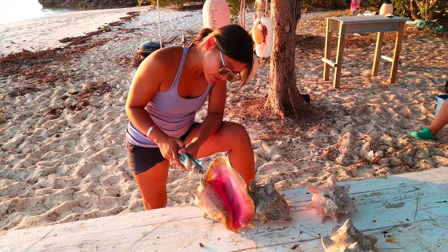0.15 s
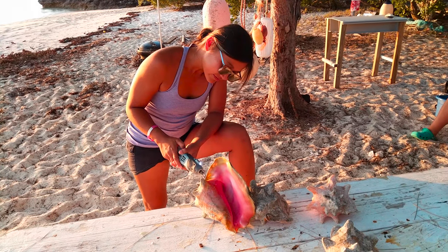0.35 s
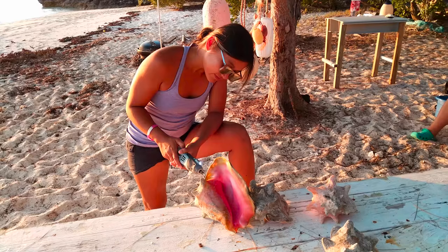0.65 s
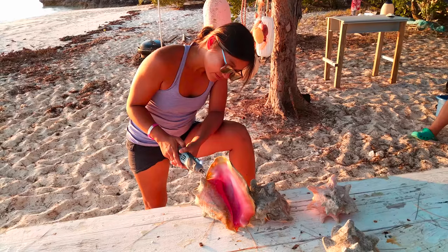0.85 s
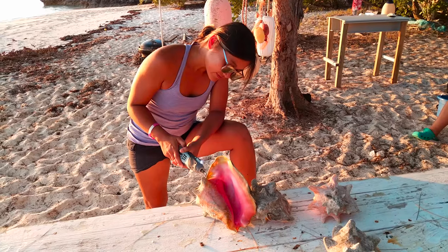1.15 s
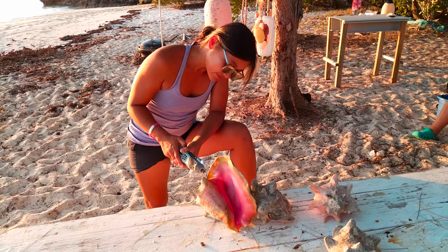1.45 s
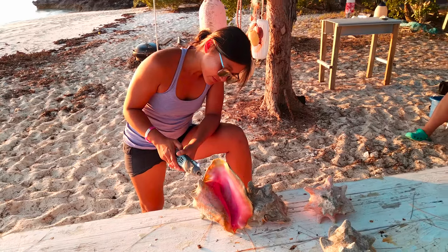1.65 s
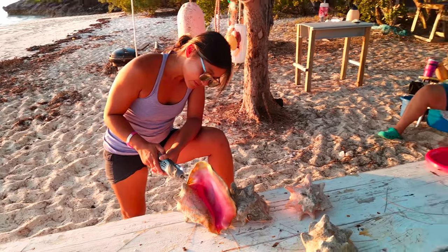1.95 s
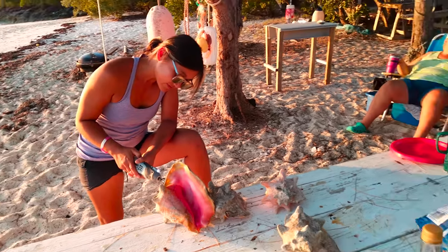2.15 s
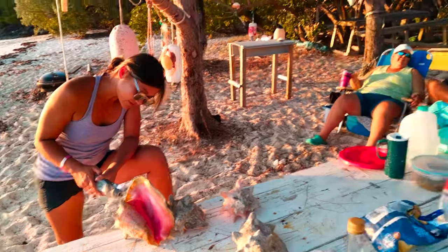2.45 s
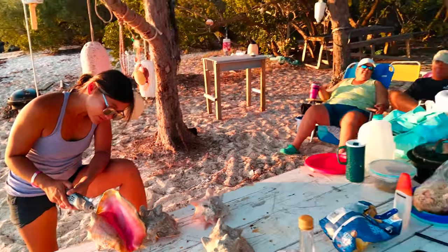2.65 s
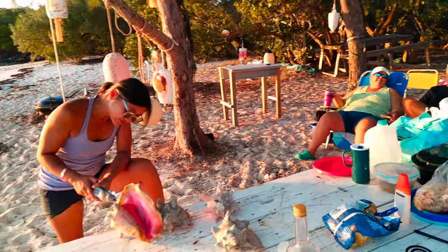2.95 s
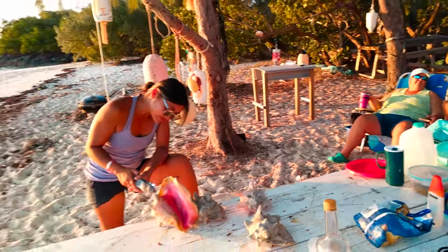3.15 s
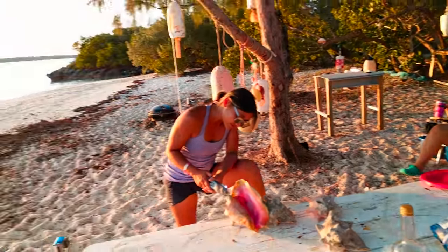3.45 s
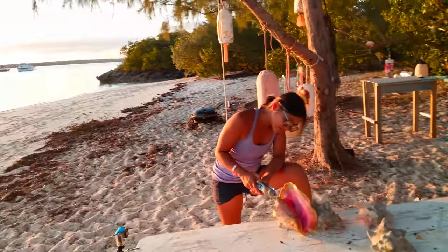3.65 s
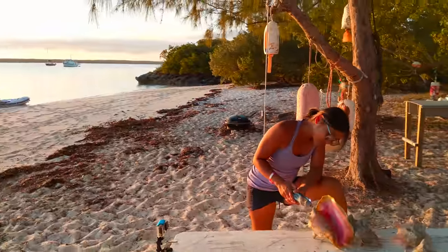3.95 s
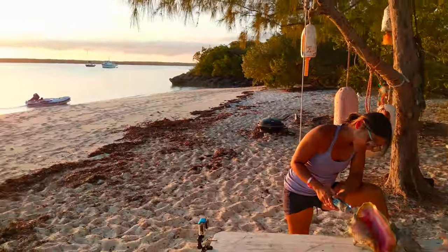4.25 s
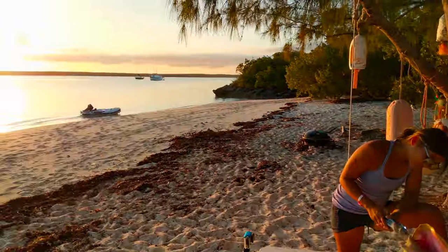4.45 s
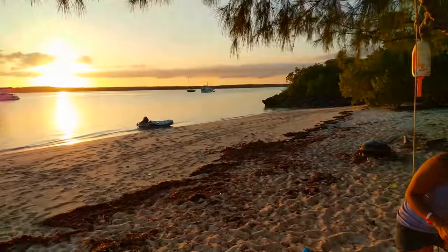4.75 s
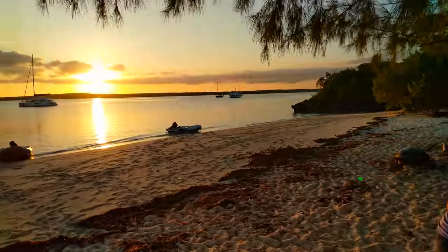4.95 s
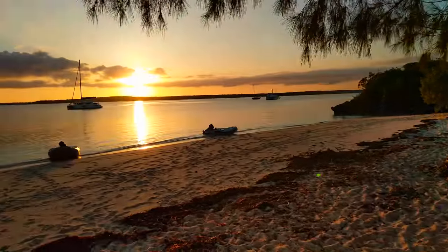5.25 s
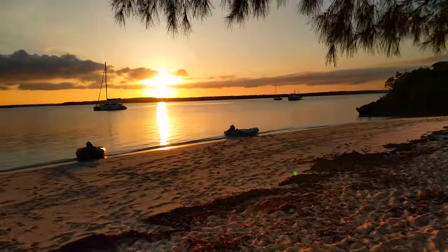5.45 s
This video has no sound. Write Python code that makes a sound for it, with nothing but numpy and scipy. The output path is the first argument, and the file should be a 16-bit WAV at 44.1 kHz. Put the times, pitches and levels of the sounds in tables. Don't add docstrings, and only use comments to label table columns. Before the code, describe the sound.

A small electric grinder works a hard shell about an arm's length from one microphone outdoors. Its many-toned whine holds nearly steady, wavering with the load, over dense scraping hiss with thin high ringing tones. Low gusts thump the microphone and faint waves wash behind. After about three and a half seconds the motor runs a touch faster and the scrape becomes less ringing, continuing to the end.

```python
import sys
import numpy as np
from scipy import signal
from scipy.fft import rfft, irfft, next_fast_len
from scipy.io import wavfile
from scipy.ndimage import uniform_filter1d

SR = 44100
rng = np.random.default_rng(int(sys.argv[2]) if len(sys.argv) > 2 else 0)


def log_audio(samples):
    frames = np.atleast_2d(samples).T
    limited = np.clip(frames, -1, 1)
    pcm = np.round(limited * 32767).astype(np.int16)
    wavfile.write(sys.argv[1], SR, pcm)


def level_to_linear(level):
    exponent = np.asarray(level, float) / 20
    return 10 ** exponent


N = 247665
TIME = np.arange(N) / SR

# (frequency [Hz], density [dB per Hz])
RUMBLE_SPECTRUM = [(21, -35), (36, -5.5), (66, 4), (150, -13.5), (200, -43), (330, -120)]
# (frequency [Hz], density [dB per Hz])
SURF_SPECTRUM = [(76, -35), (130, -8), (345, -8), (404, -8), (420, -8.5), (550, -24), (920, -120)]
# (time [s], level [dB])
GUSTS = [
    (.27, 5),
    (1.91, 0),
    (2.3, 5),
    (2.55, 8),
    (3.06, 2.5),
    (4.14, 10),
    (4.3, 8),
    (4.6, 3),
    (5.06, 6),
    (5.47, 6),
]
# (start [s], end [s], level [dB])
WAVES = [
    (-.1, .25, 9.5),
    (.9, 1.3, 4.5),
    (2.5, 2.85, 2.5),
    (4.25, 4.9, 3.5),
    (5.3, 5.7, 6),
]

# (time [s], speed [turns per s])
SHAFT_SPEED = [(0, 451.5), (.4, 450), (.62, 452.2), (.89, 453.3), (1.25, 450.3), (1.64, 447.5),
               (1.8, 450.1), (2.2, 451.7), (2.46, 451.2), (2.85, 449.6), (3.22, 449.6), (3.52, 452),
               (3.82, 459.3), (4.07, 462), (4.17, 460.2), (4.63, 463.6), (5.16, 462.4), (5.62, 462.8)]
# (start [s], seating [0 skipping to 1 seated], bite into the shell [dB], cage beat [dB])
HOLDS = [(0, 0.01, 1.5, -1.5), (.51, 1, 0.5, 0.1), (.93, 0.01, 2, -5.5), (1.6, 0.8, 0.5, 1.1),
         (2.05, 0.48, -1, 1.1), (2.55, 0.4, -2.5, -0.7), (2.96, 0.01, -6.5, -10), (3.58, 0.47, -1.5, -17),
         (4.13, 0.66, -12, -3), (4.55, .98, -10, -6), (5.1, .99, -7, -14)]
# (time [s], first dip [Hz], second dip [Hz], second dip depth [dB], crest gain [dB])
MIC_TURN = [(0, 3130, 7300, 7.5, 0.5), (2.0, 3160, 6900, 3, -0.5), (2.9, 2990, 6340, 8, 1.5),
            (3.2, 3120, 7000, 6, 3.5), (3.45, 3330, 7800, 11, 2.5), (3.65, 3770, 8500, 8, 2),
            (3.85, 3860, 9200, 4, 4), (4.2, 4000, 8550, 3, 7.5), (4.55, 4160, 8900, 4, 5.5),
            (4.8, 4200, 9100, 6, 0), (5.05, 4300, 9050, 5, .1), (5.62, 4180, 9000, -4.5, 4)]

# (order [per turn], seated [dB], skipping [dB], change when turned away [dB])
LOW_ORDERS = [
    (1, -53, -54.5, -2),
    (2, -41, -49, 0.5),
    (3, -54, -46, -1.5),
    (4, -43.5, -42.5, -3),
    (5, -44.5, -58, -4.5),
    (6, -46.5, -45, 0.7),
    (12, -43, -48.5, -2.1),
]
# (start [s], end [s], order [0 = bounce], change [dB])
SWELLS = [(0.2, .6, 1, -2.5), (2.3, 2.96, 1, 4), (3.5, 3.76, 1, -5), (3.8, 4.18, 1, -2.5),
          (3, 3.05, 2, -10.1), (3.48, 3.6, 2, -3), (6, 4.08, 5, -4), (2.5, 1.7, 5, -2), (1.8, 2.0, 6, 3),
          (4.5, 4.72, 6, -4.5), (.2, 0.51, 4, 1.5), (3.88, 4.16, 4, 2.5), (3.3, 3.78, 1, -4.5),
          (3, 3.48, 2, -13), (2.05, 2.96, 3, 4), (2.6, 2.96, 3, 3), (3.3, 3.56, 3, -6), (2, 2.95, 4, -5),
          (3.5, 3.85, 4, -3), (5.0, 5.7, 4, -2.5), (2.05, 3.05, 5, 2.5), (4.13, 4.55, 5, 6),
          (2.22, 4.13, 6, -5), (2.85, 3.4, 6, -3), (5.1, 5.7, 6, 2), (2, 2.95, 12, 3.5),
          (3.65, 3.9, 12, 2.5), (2, 3.1, 0, -5.5), (5.0, 5.7, 0, -4)]
# (order [per turn], level against the bounce [dB])
HALF_ORDERS = [
    (.5, -15),
    (1.5, -1),
    (2.5, -4),
    (3.5, -2),
    (4.5, -4),
    (5.5, -6),
]
# (order [per turn], level against that order [dB])
CAGE_LINES = [
    (1, -7),
    (2, -23),
    (4, -10.5),
    (6, -16.5),
]
# (order [per turn], level against the ball tone [dB])
BALL_ORDERS = [
    (3.553, 1),
    (4.555, -13),
    (5.555, -6),
]
# (start [s], end [s], level [dB])
RATTLES = [
    (.35, .7, -50),
    (3.7, 4.06, -54.5),
]
# (start [s], end [s], order [per turn], level [dB])
SINGING_ORDERS = [(4.1, 7.1, 8, -59.5), (0.93, 1.47, 9, -59), (2.3, 2.97, 9, -55.5), (4.6, 5.7, 9, -63),
                  (2.03, 2.45, 10, -53), (4.2, 5.7, 10, -58.5), (4.3, 6.4, 11, -59), (3.8, 5.7, 13, -60),
                  (.5, 1.32, 14, -59), (0.36, 1.1, 16, -58), (3.9, 5.4, 16, -58),
                  (3.7, 4.5, 17, -62), (4.3, 5.7, 21, -64), (3.7, 4.6, 24, -66), (1.3, 2.1, 26, -60),
           (3.5, 4.05, 27, -53), (1.7, 2.9, 28, -57), (2.4, 3.3, 25, -62), (4.7, 5.0, 17, -55),
           (5.2, 5.7, 17, -53), (5.0, 5.7, 18, -47), (5.2, 5.7, 20, -56), (3.5, 4.14, 21, -54),
           (.5, 1.3, 22, -51), (1.63, 2.0, 22, -45.5), (3.7, 4.15, 22, -53), (2.45, 2.7, 23, -51),
           (3.42, 4.3, 23, -50.5), (4.8, 5.7, 23, -49.5), (.1, 1.3, 24, -58), (3.8, 4.86, 26, -53.5),
           (1.4, 2.4, 27, -58), (5.0, 5.7, 27, -50), (4.2, 4.9, 28, -58), (1.2, 2.8, 29, -53),
           (4.35, 5.0, 29, -49), (1.9, 2.91, 30, -46.5), (4.33, 4.9, 30, -50), (0.06, 0.62, 31, -43.5),
           (0.81, 1.83, 31, -46), (3.04, 3.45, 31, -50)]

# (frequency [Hz], density [dB per Hz])
HISS_SPECTRUM = [(150, -71), (250, -28.5), (408, -21), (451, -19.5), (534, -15.5), (814, -11.5), (901, -6),
                 (1050, -11), (1830, -12.5), (3140, -8.5), (5120, -4.5), (8790, -9), (14100, -13)]
# (frequency [Hz], width [Hz], level [dB])
CAVITY = [
    (1587, 490, -1.5),
    (2120, 166, -3),
]
# (frequency [Hz], width [Hz], level [dB])
LIP = [
    (4660, 510, -8.5),
    (4986, 110, -2.5),
    (9950, 850, -4.5),
]
# (frequency [Hz], width [Hz], level [dB])
WHISTLE = [
    (12050, 250, -12),
    (13480, 300, -4),
]
# (start [s], end [s], change [dB])
WHISTLES = [
    (.4, 1.0, 2.1),
    (2.2, 2.65, 6),
    (2.95, 3.45, 2.1),
    (4.306, 4.95, 7),
    (5.22, 5.36, 7),
]
# (start [s], end [s], change [dB])
LIP_RINGS = [
    (0, 1.08, -2),
    (1.1, 1.6, 5),
    (2.98, 3.3, 2),
    (3.31, 4.34, -3),
    (2.65, 2.95, -5),
    (4.96, 5.22, 11),
]
# (start [s], end [s], from [Hz], to [Hz], depth [dB])
SHADOWS = [
    (2.3, 3.1, 10200, 10400, 3),
    (3.3, 3.95, 11000, 13300, 5),
    (4.62, 5.4, 9500, 14000, 7),
    (3.25, 4.36, 3500, 4300, 3),
    (0.4, 1.9, 8200, 8400, 2.5),
    (.6, 2.0, 11000, 11200, 2),
]
# (time [s], low edge [Hz], high edge [Hz], level [dB])
WIDE_PATCHES = [(.729, 7640, 9730, -51), (.965, 4570, 6160, -46), (.965, 12300, 13800, -46),
                (2.125, 7700, 9700, -49), (2.664, 8200, 9730, -52), (3.637, 4300, 5130, -54),
                (3.637, 7750, 8830, -58), (3.637, 11000, 12400, -51), (4.263, 5640, 6930, -53),
                (4.263, 11000, 12400, -48), (4.495, 10270, 12300, -48), (4.868, 6300, 7670, -53)]


def rms_one(x):
    return x / np.sqrt(np.mean(x ** 2) + 1e-20)


def in_time(rows, at=TIME):
    s, *columns = np.transpose(rows)
    return [np.interp(at, s, column) for column in columns]


def drift(rate):
    r = np.exp(-80 * np.pi * rate / SR)
    noise = rng.standard_normal(N // 40 + 2002)
    slow = signal.lfilter([1], [1, -2 * r, r * r], noise)[2000:]
    return np.interp(np.arange(N) / 40, np.arange(len(slow)), rms_one(slow - slow.mean()))


def coloured(spectrum):
    hz, db = np.transpose(spectrum)
    size = next_fast_len(N)
    grid = np.fft.rfftfreq(size, 1 / SR) + 1
    gain = level_to_linear(np.interp(np.log(grid), np.log(hz), db))
    return rms_one(irfft(rfft(rng.standard_normal(size)) * gain, size)[:N])


def resonate(x, modes):
    out = 0
    for k, (hz, width_hz, db) in enumerate(modes):
        r = np.exp(-np.pi * width_hz / SR)
        poles = [1, -2 * r * np.cos(2 * np.pi * hz / SR), r * r]
        ringing = signal.lfilter([1, 0, -1], poles, x)
        out = out + (-1) ** k * level_to_linear(db) * rms_one(ringing)
    return out


def tone(turns, order, beside_hz=0):
    return np.sqrt(2) * np.sin(2 * np.pi * (order * turns + beside_hz * TIME + rng.random()))


def spell(start, end, ramp_s):
    return np.clip(np.minimum(TIME - start, end - TIME) / ramp_s + 0.5, 0, 1)


def spells_db(rows, ramp_s):
    return sum(db * spell(start, end, ramp_s) for start, end, db in rows)


def away():
    facing_hz, away_hz = 3150, 4150
    return np.clip((in_time(MIC_TURN)[0] - facing_hz) / (away_hz - facing_hz), 0, 1)


def holds():
    start, *columns = np.transpose(HOLDS)
    now = np.clip(np.searchsorted(start, TIME) - 1, 0, None)
    return uniform_filter1d(np.array(columns)[:, now], size=int(0.03 * SR))


def wind():
    gust_s, buffet_hz, buffet_end_s = 0.035, 13, 0.31
    rumble_db = -65.5 + 4 * away() + 0.69 * drift(5)
    for s, db in GUSTS:
        rumble_db += db * np.exp(-0.5 * ((TIME - s) / gust_s) ** 2)
    surf_db = -70 + spells_db(WAVES, 0.15) + 1.1 * drift(8.9)
    buffet = np.sin(2 * np.pi * buffet_hz * TIME + 1.5 * drift(6))
    buffet *= np.clip((buffet_end_s - TIME) / 0.02, 0, 1)
    rumble = level_to_linear(rumble_db) * coloured(RUMBLE_SPECTRUM)
    surf = level_to_linear(surf_db) * coloured(SURF_SPECTRUM)
    return rumble + surf + level_to_linear(-56) * buffet


def shaft_turns():
    speed = uniform_filter1d(in_time(SHAFT_SPEED)[0], size=3000)
    return np.cumsum(speed + 0.298 * drift(35.2)) / SR


def whine(turns):
    seated, _, cage_db = holds()
    turned = away()
    cage_hz = 59.3
    levels = {}
    for order, seated_db, skipping_db, away_db in [*LOW_ORDERS, (0, -66, -55.5, -2.1)]:
        levels[round(order)] = skipping_db + seated * (seated_db - skipping_db) + turned * away_db
    for start, end, order, db in SWELLS:
        levels[round(order)] = levels[round(order)] + db * spell(start, end, 0.06)
    bounce_db = levels.pop(0)
    ball_db = -59 + 4.5 * turned

    out = np.zeros(N)
    for order, db in levels.items():
        out += level_to_linear(db + 0.52 * drift(20) + 0.66 * drift(2.8)) * tone(turns, order)
    for order, db in HALF_ORDERS:
        out += level_to_linear(bounce_db + db + 1.5 * drift(20)) * tone(turns, order)
    for order, db in CAGE_LINES:
        out += level_to_linear(levels[round(order)] + db + cage_db + 1.2 * drift(15)) * tone(turns, order, cage_hz)
    spin_db = -70 + 7 * seated - 8.2 * turned + 3.5 * drift(17)
    out += level_to_linear(spin_db) * tone(turns, 2.776)
    rattle = sum(level_to_linear(db) * spell(start, end, 0.1) for start, end, db in RATTLES)
    out += rattle * level_to_linear(1.5 * drift(15)) * tone(turns, 4.5)
    for order, db in BALL_ORDERS:
        out += level_to_linear(ball_db + db) * (0.32 + 0.68 * drift(11.4)) * tone(turns, order)
    return out


def high_orders(turns):
    faint, singing, turned = 0, 0, away()
    for order in set(range(7, 32)) - {12}:
        wavering = level_to_linear(2.2 * drift(25)) * tone(turns + 0.003 * drift(30), order)
        faint = faint + level_to_linear(-62 + 1.5 * turned + 2.5 * drift(1.14)) * wavering
        for start, end, singer, db in SINGING_ORDERS:
            if round(singer) == order:
                singing = singing + level_to_linear(db) * spell(start, end, 0.16) * wavering
    return faint, singing


def grit(turns):
    bite_db = uniform_filter1d(holds()[1], size=4000)
    turned = away()
    hiss_db = -38.5 + 0.065 * bite_db + 0.28 * turned
    cavity_db = -46 + 0.93 * bite_db - 3 * turned
    lip_db = -42.5 + 0.31 * bite_db - 14 * turned
    whistle_db = -44.5 + 0.01 * bite_db - 2.1 * turned + spells_db(WHISTLES, 0.1)
    low_board_db = -52 + 0.01 * bite_db - 5 * turned
    high_board_db = -49 + 0.01 * bite_db + 0.6 * turned
    ring_db = lip_db + spells_db(LIP_RINGS, 0.1)
    low_board_db += 2.4 * spell(2.72, 3.55, 0.2)

    # its modes (frequency [Hz], width [Hz], level [dB]) and its level
    bodies = [(CAVITY, cavity_db),
              (LIP[::2], (lip_db + ring_db) / 2),
              (LIP[1:2], ring_db + 0.7 * drift(30)),
              (WHISTLE, whistle_db),
              ([(705, 150, -2.5)], low_board_db),
              ([(2510, 690, 1.25)], high_board_db)]
    out = level_to_linear(hiss_db + 0.35 * drift(2.3)) * coloured(HISS_SPECTRUM)
    for modes, db in bodies:
        scrape = rng.standard_normal(N)
        out += level_to_linear(db + 0.52 * drift(17) + 0.43 * drift(4.9)) * resonate(scrape, modes)
    return out * (1 + 0.12 * np.cos(2 * np.pi * turns) + 0.05 * np.cos(np.pi * turns))


def table_bounce(x):
    hz, s, frames = signal.stft(x, SR, nperseg=1024)
    first_hz, second_hz, second_db, crest_db = in_time(MIC_TURN, s)
    turned = np.interp(s, TIME, away())
    # (centre [Hz], width [Hz], depth [dB])
    dips = [(first_hz, 260 + 40 * turned, 9.5),
            (second_hz, 480, second_db),
            (0.48 * first_hz, 97, 3.9 * (0.18 + turned)),
            (2.89 * first_hz, 600, -crest_db),
            (5980, 76, 2)]
    for start, end, from_hz, to_hz, db in SHADOWS:
        centre = np.interp(s, [start, end], [from_hz, to_hz])
        dips.append((centre, 500, db * np.interp(s, TIME, spell(start, end, 0.22))))

    patches = uniform_filter1d(rng.standard_normal(frames.shape), size=5, axis=0)
    patches = uniform_filter1d(patches, size=30, axis=1)
    gain_db = 1.1 * rms_one(patches)
    for centre, width_hz, depth_db in dips:
        gain_db -= depth_db * np.exp(-0.5 * ((hz[:, None] - centre) / width_hz) ** 2)
    return signal.istft(frames * level_to_linear(gain_db), SR, nperseg=1024)[1][:N]


def scene():
    turns = shaft_turns()
    fade = np.clip(0.18 + TIME / 0.36, 0, 1)
    faint, singing = high_orders(turns)
    tool = whine(turns) + singing + table_bounce(grit(turns) + faint)
    mono = wind() + fade * tool
    return np.array([mono, mono])


def low_pass(x):
    return signal.sosfilt(signal.butter(12, 15460, fs=SR, output="sos"), x)


def record(dry):
    side = np.zeros(N)
    for s, low_hz, high_hz, db in WIDE_PATCHES:
        band = signal.butter(8, [low_hz, high_hz], "band", fs=SR, output="sos")
        burst = signal.sosfilt(band, rng.standard_normal(4096))[2048:]
        at = round(s * SR) - 1024
        side[at:at + 2048] += level_to_linear(db) * rms_one(burst) * signal.windows.tukey(2048, 0.8)
    size = next_fast_len(N)
    kept = np.fft.rfftfreq(size, 1 / SR) < 14270
    mix = irfft(rfft(dry + side * [[1], [-1]], size) * kept, size)[:, :N]
    return low_pass(mix)


dry = scene()
out = record(dry)
log_audio(out)
```